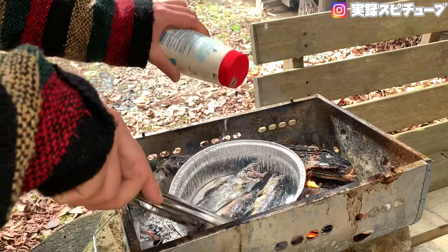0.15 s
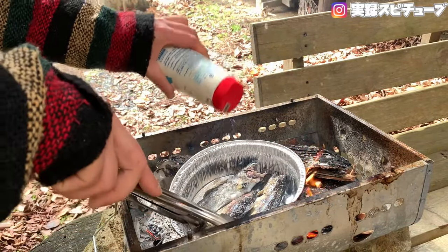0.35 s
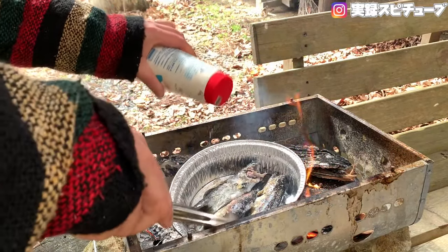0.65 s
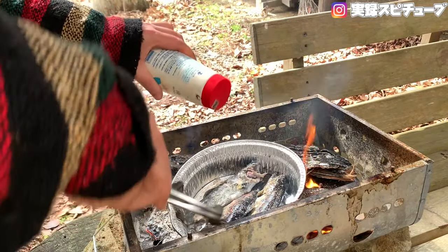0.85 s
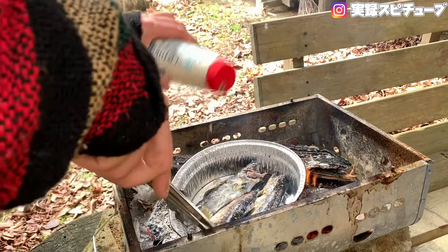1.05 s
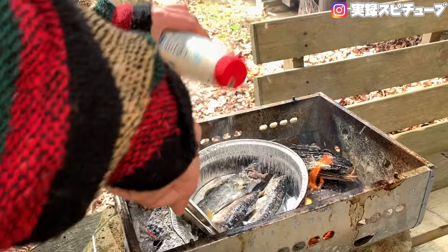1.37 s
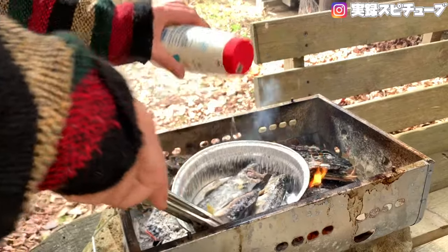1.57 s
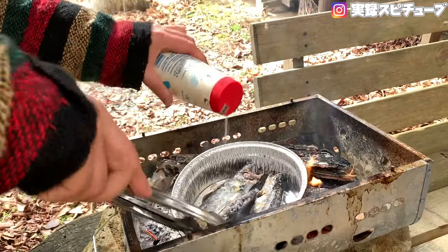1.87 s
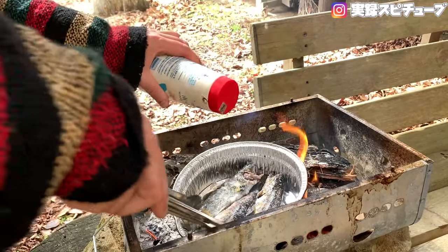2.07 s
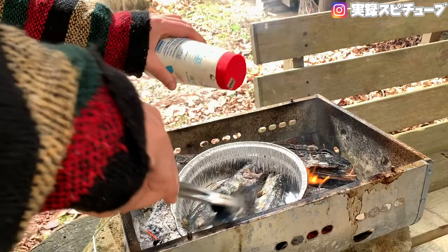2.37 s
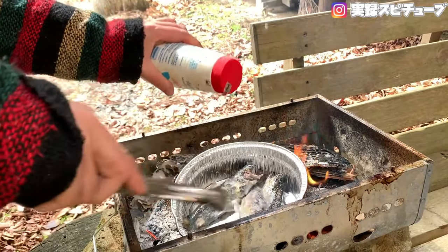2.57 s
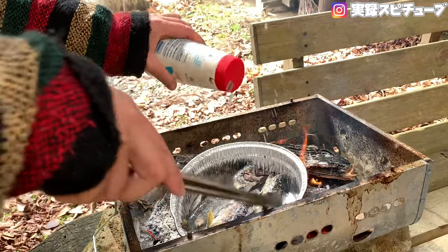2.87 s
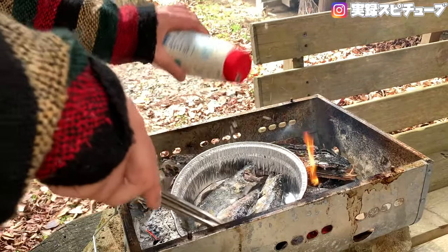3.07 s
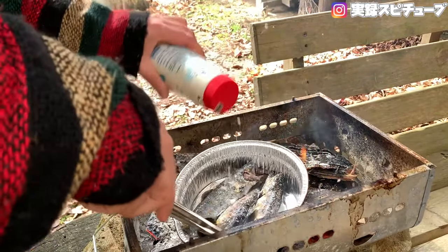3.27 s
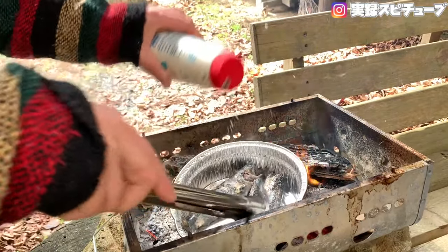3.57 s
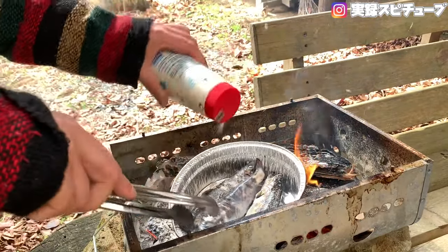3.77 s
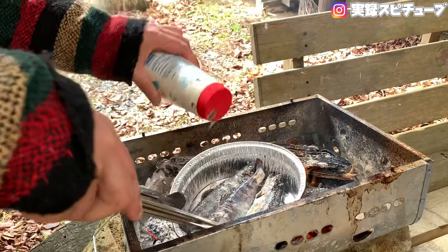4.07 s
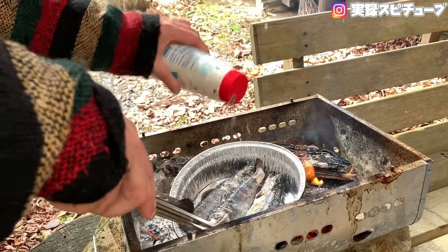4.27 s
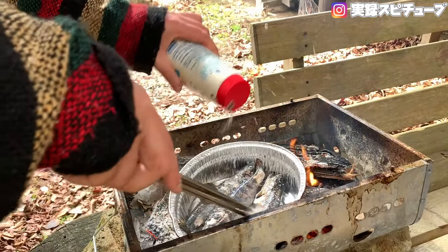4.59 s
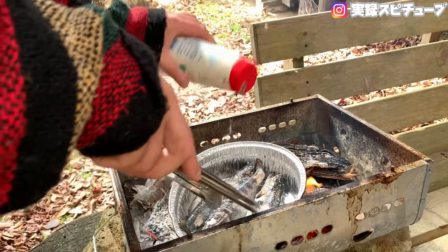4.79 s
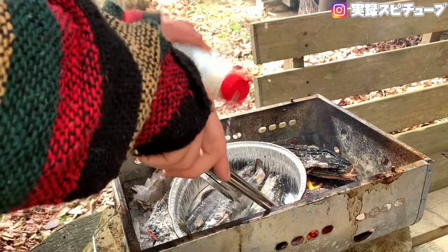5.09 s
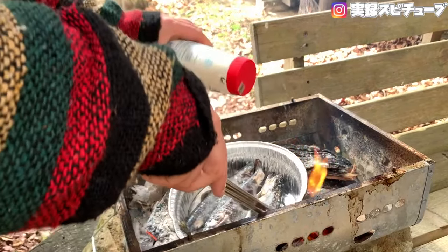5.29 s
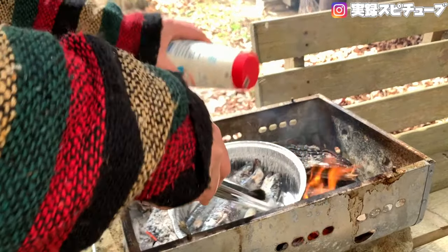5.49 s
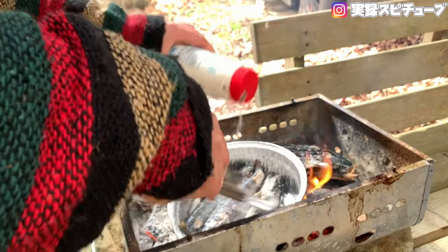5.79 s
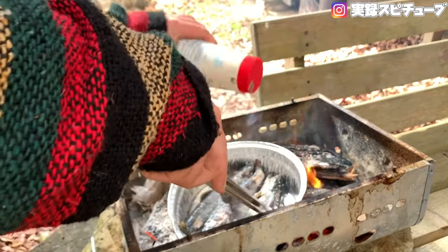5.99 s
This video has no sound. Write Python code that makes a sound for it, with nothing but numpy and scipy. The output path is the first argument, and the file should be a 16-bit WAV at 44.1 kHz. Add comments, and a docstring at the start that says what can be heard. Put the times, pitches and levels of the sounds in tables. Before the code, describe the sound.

A soft, steady ember hiss lies under fast shaker strokes of dry salt, about fourteen a second. Foil buckles with short dull toks, most strongly just before three seconds, and creases snap and crackle under dragging metal tongs. Crisp high clicks and occasional hollow box clangs punctuate it, ending with a clap of the tongs and more knocks. Low, woolly arm bumps and air flutter come close to the stereo microphone in dry open air.

```python
"""Salt rattles in a plastic bottle, shaken by hand over fish in a foil tray, above the soft hiss of charcoal outdoors.
A knitted sleeve rumbles and flutters near the stereo microphone; tongs make the foil tok, scrape and crinkle.
Sharp steel clicks follow, then knocks on the sheet-steel firebox that thud, clang and boom.
Shaped noise and tiny impacts make the hiss, salt and scrapes; damped sines make the metal and the bumps."""
import sys
import numpy as np
from scipy import signal
from scipy.fft import rfft, irfft, next_fast_len
from scipy.io import wavfile
from scipy.ndimage import uniform_filter1d, map_coordinates

SR = 44100
rng = np.random.default_rng(int(sys.argv[2]) if len(sys.argv) > 2 else 0)


def unload_wav(signal):
    """Save mono or channel-first audio to the path in sys.argv[1] as 16-bit WAV at rate SR, clipped to [-1, 1]."""
    wavfile.write(
        sys.argv[1],
        SR,
        np.round(np.clip(np.atleast_2d(signal).T, -1, 1) * 32767).astype(np.int16),
    )


N = 270774
TOP_HZ = 15900  # upper band limit

# Every source is a pair of rows: direct sound and scattered sound.
# Table levels set the balance within a source; its function adds the trims.


def amp(db):
    """Decibels to gain."""
    return 10 ** (np.asarray(db) / 20)


def unit(x):
    """Scale x to rms 1."""
    return x / np.sqrt(np.mean(x ** 2) + 1e-20)


def along(points, hz):
    """Read (f/Hz, value) points on a log frequency axis."""
    f, value = np.transpose(points)
    return np.interp(np.log(hz + 1), np.log(f + 1), value)


def wobble(rate):
    """A smooth random curve with rate knots a second."""
    knots = rng.standard_normal(int(N * rate / SR) + 4)
    return map_coordinates(knots, [np.arange(N) * rate / SR])


def filtered(x, response):
    """Multiply the spectrum of x by a response of frequency."""
    n = x.shape[-1]
    m = next_fast_len(n + 8192)
    return irfft(rfft(x, m) * response(np.fft.rfftfreq(m, 1 / SR)), m)[..., :n]


def coloured(x, spectrum):
    """Shape x by a spectrum in dB and scale it to rms 1."""
    return unit(filtered(x, lambda hz: amp(along(spectrum, hz))))


def noise(spectrum, size=N):
    """Two unrelated coloured noises: direct and scattered sound."""
    return coloured(rng.standard_normal((2, size)), spectrum)


def grains(spectrum, rate, spread_db):
    """Tiny impacts of uneven size, rate a second on average, at rms 1."""
    size_db = spread_db * np.minimum(rng.exponential(size=N), 4)
    hits = (rng.random(N) < rate / SR) * amp(size_db)
    return coloured(hits * rng.standard_normal((2, N)), spectrum)


def scrape(spectrum, t, rate, spread_db):
    """Edges chatter on sheet metal: a run of separate tiny contacts, at rms 1."""
    hits = (rng.random(len(t)) < rate / SR) * amp(spread_db * rng.standard_normal(len(t)))
    return coloured(hits * rng.choice([-1, 1], (2, len(t))), spectrum)


def fade(t, t60):
    """Exponential decay, down 60 dB after t60 seconds."""
    return np.exp(-np.log(1000) * t / t60)


def onset(t, attack_s):
    """Exponential rise from 0 towards 1."""
    return 1 - np.exp(-t / attack_s)


def ring(modes, t, t60, scatter_db):
    """Damped modes with fresh random strengths and phases, starting near rms 1."""
    hz, db = np.transpose(modes)[:2, :, None]
    gain = amp(db + scatter_db * rng.standard_normal((2, len(modes), 1)))
    phase = 2 * np.pi * rng.random(gain.shape)
    waves = gain * np.sin(2 * np.pi * hz * t + phase) * fade(t, np.reshape(t60, (-1, 1)))
    return waves.sum(axis=1) / np.sqrt(np.sum(gain ** 2, axis=1) / 2)


def snap(hz, t, t60, octaves, count=4):
    """A small patch of metal lets go: a few chance modes around a pitch."""
    pitches = np.minimum(hz * 2 ** (octaves * rng.uniform(-1, 1, count)), TOP_HZ)
    return ring([(f, 0) for f in pitches], t, t60, scatter_db=5.5)


def swell(s, rise, fall, shape):
    """A hump of height 1 at s seconds; the higher the shape, the rounder its top."""
    first, last = max(int((s - 5 * rise) * SR), 0), min(int((s + 5 * fall) * SR), N)
    near = np.arange(first, last)
    u, hump = near / SR - s, np.zeros(N)
    hump[near] = np.exp(-np.abs(u / np.where(u < 0, rise, fall)) ** shape)
    return hump


def patchy(x, depth_db, size=3):
    """The colour shifts at random as the contact moves from spot to spot."""
    z = signal.stft(x, nperseg=512)[2]
    field = uniform_filter1d(rng.standard_normal(z.shape[1:]), size, axis=0)  # smooth over frequency
    field = uniform_filter1d(field, 2 * size, axis=1)  # smooth over time
    return unit(signal.istft(z * amp(depth_db * unit(field)), nperseg=512)[1][:, :N])


def add(track, s, sound):
    """Mix a sound into the track at s seconds."""
    part = track[:, max(round(s * SR), 0):][:, :sound.shape[1]]
    part += sound[:, :part.shape[1]]


# colour of the coal hiss: f/Hz, level/dB
COAL_COLOUR = [(20, -10), (50, 6), (100, -2.5), (300, 2.5), (1000, -3.5), (2500, -8.5), (5000, -12.5),
               (8000, -14), (15500, -11.5)]
# colour of small foil and ember ticks: f/Hz, level/dB
FOIL_COLOUR = [(200, -5), (450, -2.5), (1000, 3.5), (1800, -8), (3000, -6), (6000, -12), (16000, -5)]
# colour of low air rumble: f/Hz, level/dB
RUMBLE_COLOUR = [(15, -38), (30, -6), (55, 6), (85, 1.5), (125, -10), (200, -19), (500, -40)]
DRAUGHT_DB, DRAUGHT_SWING_DB = -50.5, 5  # moving air at the microphone: centre level, depth of its swells


def coals():
    """Burning charcoal and hot fat: a soft steady hiss with faint crackles, in a light uneven draught."""
    hiss = amp(-41.5 + 0.47 * wobble(6.0)) * noise(COAL_COLOUR)
    draught_level = amp(DRAUGHT_DB + DRAUGHT_SWING_DB * wobble(6))
    draught = draught_level * noise(RUMBLE_COLOUR) * amp([[0], [-4]])
    crackles = amp(-56) * grains(FOIL_COLOUR, rate=120, spread_db=1)
    return hiss + crackles + draught


def steadied(x, size=1300):
    """Even out the slow swells of a noise."""
    return x / np.sqrt(np.abs(uniform_filter1d(x ** 2, size, axis=1)) + 0.042)


# arm sweeps past the microphone: fastest t/s, time to swell or fade t/s, rumble level/dB, flutter level/dB
ARM_SWEEPS = [(0.1, 0.089, -33, -39.5), (0.26, 0.06, -26.5, -34), (0.45, 0.019, -26.5, -55),
              (0.73, 0.13, -27.5, -35.5), (0.95, 0.19, -34, -49), (1.93, 0.058, -28.5, -40),
              (2.41, 0.066, -32.5, -47), (2.69, 0.091, -28.5, -40), (2.82, 0.032, -22, -34),
              (2.96, 0.2, -35, -49), (3.63, 0.08, -30, -30), (3.78, 0.083, -25.5, -29.5),
              (3.99, 0.16, -34.5, -57), (4.5, 0.32, -41, -44), (5.301, 0.12, -34, -40.5)]
# soft bumps of arm and sleeve: t/s, level/dB, f/Hz, t60/s
SLEEVE_BUMPS = [(0.08, -24, 59.6, .09), (0.623, -16.5, 135, 0.064), (0.660, -20.5, 150, 0.052),
                (0.699, -25, 413, 0.027), (0.704, -22, 98, .075), (0.724, -23, 193, 0.051),
                (0.768, -24, 170, 0.051), (0.787, -20.5, 100, 0.078), (0.922, -22, 370, 0.028),
                (0.93, -15, 258, 0.027), (0.944, -22, 140, 0.055), (0.965, -23, 134, .04),
                (1.925, -27, 61.6, .09), (2.649, -25, 135, 0.065), (2.675, -26, 70, 0.054),
                (2.813, -24, 90, 0.04), (3.745, -20, 290, 0.045), (3.75, -17.5, 158, 0.045),
                (3.786, -20, 257, 0.026), (5.276, -26.5, 65, 0.076)]
# colour of the higher flutter: f/Hz, level/dB
FLUTTER_COLOUR = [(60, -23), (115, 0.5), (170, 6), (260, -6.5), (400, -11.5), (800, -38), (2500, -60)]
IDLE_RUMBLE_DB, IDLE_FLUTTER_DB = -49.5, -47.5  # the arm is never quite still; before wobble and trims


def sleeve(attack_s=.003):
    """Each sweep of the arm pushes air and wool about near the microphone, with soft bumps."""
    idle = amp(4.5 * wobble(11))
    rumble_power = (amp(IDLE_RUMBLE_DB) * idle) ** 2
    flutter_power = (amp(IDLE_FLUTTER_DB) * idle) ** 2
    for s, width, rumble_db, flutter_db in ARM_SWEEPS:
        speed = swell(s, width, width, shape=1.15)
        rumble_power = rumble_power + (amp(rumble_db) * speed) ** 2
        flutter_power = flutter_power + (amp(flutter_db) * speed) ** 2
    rumble = np.sqrt(rumble_power) * steadied(noise(RUMBLE_COLOUR))
    flutter = amp(-2.5) * np.sqrt(flutter_power) * steadied(noise(FLUTTER_COLOUR))
    out, t = rumble + flutter, np.arange(SR // 5) / SR
    for s, db, hz, t60 in SLEEVE_BUMPS:
        tone = np.sin(2 * np.pi * (hz * t + rng.random((2, 1))))
        add(out, s, amp(db + 6.5) * tone * fade(t, t60) * onset(t, attack_s) ** 2)
    return out * amp([[0], [-2]])


# bouts of even shaking: first stroke t/s, last stroke t/s, number of strokes
SHAKING_BOUTS = [(0.012, 0.655, 9), (1.168, 1.641, 7), (1.731, 2.0, 4), (2.261, 2.261, 1), (2.66, 2.766, 2),
                 (2.977, 5.125, 28), (5.208, 6.08, 11)]
# vigour of the shaking hand: t/s, stroke level/dB
HAND_VIGOUR = [(0.1, -31.5), (1.2, -34.5), (1.65, -31.5), (1.95, -33.5), (2.7, -29), (3.0, -36.5),
               (3.37, -25.5), (3.45, -32), (3.87, -29), (4.4, -36), (4.5, -32), (5.11, -40.5),
               (5.21, -32.5), (5.78, -37), (6.1, -33)]
# colour of the fine salt: f/Hz, level/dB
SALT_COLOUR = [(200, -24), (700, 0), (1500, -1), (3000, -3), (4500, 1.5), (6000, -2), (7200, 1.5),
               (8500, 4), (12000, 1.5), (15500, -1)]
# colours of coarse grains and of single large crystals: f/Hz, level/dB
COARSE_COLOUR = [(600, -14), (1800, 9.0), (4500, -25.0), (7000, 11.5), (16000, 2.5)]
CRYSTAL_COLOUR = [(1000, -31), (4000, -14), (10000, -4.5), (16000, 6.5)]
FINE_DB, COARSE_DB, CRYSTAL_DB = 0.5, -8.0, -14  # each layer against the stroke level
SLIDE_RISE_S, SLIDE_FALL_S = .020, .0195  # swell and fade of one stroke


def shaker(clump_db=1.0, uneven_db=2.4):
    """At each stroke the salt slides and pelts the plastic bottle wall in clumps; coarse crystals tick."""
    bouts = [np.linspace(first, last, round(count)) for first, last, count in SHAKING_BOUTS]
    strokes = np.concatenate(bouts)
    vigour_db = np.interp(strokes, *np.transpose(HAND_VIGOUR))
    stroke_db = vigour_db + uneven_db * rng.standard_normal(len(strokes))
    power = np.zeros(N)
    for s, db in zip(strokes, stroke_db):
        power += amp(db) ** 2 * swell(s, SLIDE_RISE_S, SLIDE_FALL_S, shape=1.7)
    clumps = unit(amp(clump_db * wobble(170)))
    fine = clumps * patchy(grains(SALT_COLOUR, rate=14000, spread_db=0.35), depth_db=4)
    coarse = grains(COARSE_COLOUR, rate=430, spread_db=-3.0)
    crystals = grains(CRYSTAL_COLOUR, rate=19, spread_db=1)
    salt = amp(FINE_DB) * fine + amp(COARSE_DB) * coarse + amp(CRYSTAL_DB) * crystals
    return np.sqrt(power) * salt


# tongs dragging through the tray: t/s, level/dB
TONG_DRAG = [(0.0, -46), (0.92, -42), (1.7, -39), (1.95, -31.5), (2.1, -33.5), (2.35, -42), (2.75, -33.5),
             (2.9, -36.5), (3.2, -35.5), (3.9, -33.5), (4.5, -44.5), (4.9, -38), (5.5, -37.5),
             (5.76, -43.5), (6.1, -35.5)]


def drag_db(s):
    """Level of the dragging tongs at s seconds."""
    return np.interp(s, *np.transpose(TONG_DRAG))


# tongs stick and slip over the foil: start t/s, length t/s, slip level/dB, f/Hz
TONG_SKIDS = [(1.638, 0.026, -23.5, 1010), (1.816, 0.04, -23.5, 1060), (1.887, 0.04, -29, 940),
              (2.238, 0.046, -19.5, 1950), (2.748, 0.02, -14, 1150), (3.761, 0.025, -21.5, 870)]
SLIP_S, SLIP_SCATTER = 0.011, 0.194  # time between slips, and its relative scatter


def slips(uneven_db=4.5, detune=0.018, t60=0.014):
    """Stick and slip: each skid is a short, uneven run of small toks (t/s, level/dB, f/Hz, t60/s)."""
    rows = []
    for start, length, db, hz in TONG_SKIDS:
        for k, (late, strong, high) in enumerate(rng.standard_normal((8, 3))):
            if k * SLIP_S < length:
                s = start + SLIP_S * (k + SLIP_SCATTER * late * (k > 0))  # the first slip is on time
                rows.append((s, db + uneven_db * strong, hz * np.exp(detune * high), t60))
    return rows


# the foil tray buckles with a hollow tok: t/s, level/dB, f/Hz, t60/s
TRAY_TOKS = [(0.095, -17.5, 910, 0.011), (0.242, -16, 840, 0.012), (0.613, -11.5, 796, 0.0094),
             (0.631, -20, 860, 0.012), (0.646, -16.5, 1300, 0.016), (1.076, -16, 1090, 0.02),
             (1.198, -13, 910, 0.0065), (1.211, -21, 970, 0.0076), (1.934, -20, 1090, 0.02),
             (1.946, -10, 975, 0.013), (1.956, -13.5, 980, 0.014), (1.9765, -18, 1000, 0.015),
             (2.636, -19.5, 1525, 0.036), (2.7025, -2.5, 993, 0.013), (3.067, -8, 1070, .016),
             (3.279, -24, 1060, .014), (3.294, -15.5, 880, 0.021), (3.551, -18, 790, 0.0087),
             (3.631, -22.5, 1150, 0.029), (3.675, -23, 1100, .008), (3.685, -15.5, 630, 0.011),
             (3.747, -24, 570, 0.024), (3.857, -21, 880, 0.023), (4.327, -17, 910, .012),
             (4.748, -25, 1140, .01), (4.988, -22.5, 810, 0.019), (5.573, -34, 1150, 0.014),
             (5.58, -18, 674, 0.014), (5.642, -28, 1760, 0.03)]


def tray(attack_s=0.0014, scattered_db=-4):
    """The loaded foil gives way in a few heavily damped cycles; the tongs rub on it for a moment after."""
    out, t = np.zeros((2, N)), np.arange(SR // 12) / SR
    for s, db, hz, t60 in list(TRAY_TOKS) + slips():
        phase = np.array([[0], [rng.random()]])
        tok = np.sin(2 * np.pi * (hz * t + phase)) * fade(t, t60)
        rub_colour = [(hz / 3, -25), (hz, 0), (hz * 3, -20), (16000, -40)]
        rub = amp(-17.5) * scrape(rub_colour, t, rate=300, spread_db=-1) * fade(t, 0.088)
        add(out, s, amp(db + 3.5) * (tok + rub) * onset(t, attack_s) * amp([[0], [scattered_db]]))
    drag_level = amp(drag_db(np.arange(N) / SR) - 3.5 + 1.8 * wobble(45))
    return out + drag_level * patchy(grains(FOIL_COLOUR, rate=900, spread_db=-0.2), depth_db=5.5)


# single creases snapping: t/s, level/dB, f/Hz
FOIL_CRINKLES = [(0.083, -23, 1390), (0.0954, -19.5, 1680), (0.174, -25, 1620), (0.243, -35, 2000),
                 (0.333, -28.5, 1930), (0.344, -26, 1900), (0.416, -26, 2100), (0.484, -26, 1990),
                 (0.497, -25.5, 1300), (0.512, -22, 3750), (0.669, -23, 2360), (0.909, -28.5, 1100),
                 (1.259, -30, 3570), (1.402, -23, 2970), (1.838, -25.5, 3200), (1.934, -23, 4500),
                 (1.945, -20.5, 4200), (1.9755, -29, 4000), (2.009, -18, 1430), (2.615, -19.5, 1480),
                 (3.21, -34, 1390), (3.225, -25, 1840), (3.503, -27, 1100), (3.551, -23, 1010),
                 (3.677, -37, 1670), (3.835, -21, 4500), (4.012, -18.5, 5540), (4.5, -28, 1860),
                 (4.7, -31, 1680), (4.845, -29, 2930), (4.9875, -25, 2000), (5.058, -31, 3820),
                 (5.07, -29, 1880), (5.3008, -24, 2440), (5.322, -24, 1500), (5.988, -21, 1510),
                 (6.008, -23.5, 1590), (6.082, -30, 2600), (6.094, -19.5, 2220)]
CRACKLE_PER_S, CRACKLE_DB, CRACKLE_RISE_DB = 200, -3, 5  # rate; least level against the drag; most added
CRACKLE_HZ, CRACKLE_REACH_OCTAVES = 3415, 2.0  # middle pitch, reach to either side


def crinkles(level_db=-1, t60=0.0093, octaves=0.885, cycles=16):
    """Foil creases snap one by one; many tiny ones crackle under the dragging tongs, each at its own pitch."""
    out, t = np.zeros((2, N)), np.arange(SR // 50) / SR
    for s, db, hz in FOIL_CRINKLES:
        add(out, s, amp(db + level_db) * snap(hz, t, t60, octaves, count=8))
    for when, strong, high in rng.random((round(CRACKLE_PER_S * N / SR), 3)):
        s = when * N / SR
        hz = CRACKLE_HZ * 2 ** (CRACKLE_REACH_OCTAVES * (2 * high - 1))
        db = drag_db(s) + CRACKLE_DB + CRACKLE_RISE_DB * strong ** 2
        add(out, s, amp(db) * snap(hz, t, cycles / hz, octaves, count=3))
    return out


TOUCHES_PER_S, TOUCH_DB, TOUCH_HZ = 1.5, -23, 8200  # rate, middle level and pitch


def touches(uneven_db=3, detune=0.36):
    """The tongs touch lightly at chance moments: (t/s, level/dB, f/Hz)."""
    rows = []
    for when, strong, high in rng.random((round(TOUCHES_PER_S * N / SR), 3)):
        hz = TOUCH_HZ * np.exp(detune * (2 * high - 1))
        rows.append((when * N / SR, TOUCH_DB + uneven_db * (2 * strong - 1), hz))
    return rows


# sharp metal clicks: t/s, level/dB, contact f/Hz
STEEL_CLICKS = [(0.0975, -11, 6900), (0.174, -15, 7500), (0.416, -26, 8000), (0.253, -11.5, 11150),
                (0.512, -25, 9500), (0.53, -24, 11100), (1.259, -16.5, 9500), (1.4225, -10, 8300),
                (1.43, -18, 8850), (1.6845, -14, 4500), (2.383, -23.5, 6830), (2.421, -34, 11300),
                (2.5792, -4, 10400), (2.598, -8, 10800), (2.7005, -4.5, 10550), (2.775, -17, 11000),
                (3.065, -8.5, 10540), (3.31, -11, 10630), (3.676, -11.5, 6850), (4.0238, -8, 9900),
                (4.1612, -8, 6200), (4.2855, -13.5, 6700), (4.511, -16.5, 9150), (4.559, -31, 8000),
                (4.749, -19.5, 7000), (5.2227, -15.5, 6600), (5.3033, -20, 4260), (5.411, -13.5, 7350),
                (5.475, -12.5, 12100), (5.6114, -5.5, 7530)]
# tong tips clap shut: t/s, level/dB, arm f/Hz
TONG_CLAPS = [(2.5795, -19, 3850), (2.601, -24, 3800), (5.6116, -13.5, 2930)]
# modes of the tips in a clap: f/Hz, level/dB, t60/s
TIP_MODES = [(4760, -9, 0.017), (7150, 7, 0.034), (7700, -14, 0.02), (7800, 10, 0.026), (10100, -4, 0.033),
             (13100, 8, 0.025)]
# colour of steel cracking on steel: f/Hz, level/dB
CRACK_COLOUR = [(500, -9.5), (2000, -18.5), (3500, -2), (6000, -5.5), (8000, 3), (12000, -6), (16000, -4)]
ARM_DB, ARM_T60_S = 1, 0.072  # the arms' own note in a clap, against the tip modes


def clicks(ring_db=-12, ring_t60=0.024):
    """Steel on steel: a crack, a ping pitched by the spot, an uneven ring, faint scatter; claps ring the tongs."""
    out, t = np.zeros((2, N)), np.arange(SR // 10) / SR
    for s, db, hz in list(STEEL_CLICKS) + touches():
        crack = noise(CRACK_COLOUR, size=len(t)) * (fade(t, .017) + amp(-20) * fade(t, .09))
        ping = amp(2.5) * ring([(hz, 0)], t, 0.0044, scatter_db=0)
        after = amp(ring_db) * snap(hz, t, ring_t60, octaves=0.46)
        add(out, s, amp(db - 7.5) * (crack + ping + after) * onset(t, .0004))
    for s, db, hz in TONG_CLAPS:
        modes = np.array([(hz, ARM_DB, ARM_T60_S), *TIP_MODES])
        add(out, s, amp(db) * ring(modes, t, modes[:, 2], scatter_db=1))
    return out


THUD_DAMPING = 1.45  # exponent: how much faster the high modes die


def struck(modes, t, t60, scatter_db):
    """One push sets all modes off in phase, their gains summing to 1; the high ones die first."""
    hz, db = np.transpose(modes)[:, :, None]
    gain = amp(db + scatter_db * rng.standard_normal((2, len(modes), 1)))
    life = t60 * (hz[0] / hz) ** THUD_DAMPING
    return (gain * np.sin(2 * np.pi * hz * t) * fade(t, life)).sum(axis=1) / gain.sum(axis=1)


# heavy, damped modes of the box floor: f/Hz, level/dB
FLOOR_MODES = [(400, -19.5), (530, 1), (640, 4), (740, 3), (1080, 3), (1350, -8)]
REBOUND_S, REBOUND_DB, REBOUND_LOSS_DB = 0.013, -7.5, 3  # mean gap, first against the blow, loss a contact


def thuds(t, t60, detune=0.187, level_db=6):
    """A dull blow and its uneven rebounds, each on another spot of the box floor."""
    out = struck(FLOOR_MODES, t, t60, scatter_db=4.0)
    gaps = REBOUND_S * (.5 + rng.random(4))
    for k, s in enumerate(np.cumsum(gaps)):
        spot = np.exp(detune * rng.standard_normal())
        rebound = struck(FLOOR_MODES, spot * t, t60, scatter_db=2)
        add(out, s, amp(REBOUND_DB - k * REBOUND_LOSS_DB) * rebound)
    return amp(level_db) * out * amp([[0], [-6]])


# tongs against the firebox: t/s, clang level/dB, thud level/dB, boom level/dB, tong ring level/dB,
# clang t60/s, contact brightness f/Hz, tong f/Hz
FIREBOX_KNOCKS = [(1.076, -31, -27, -36, -25, 0.64, 2250, 4980),
                  (1.567, -25, -12.5, -28, -35, 0.48, 1060, 4950),
                  (1.9961, -25.5, -21, -28, -19, 0.33, 2540, 4940),
                  (2.944, -23.5, -42, -31.5, -17.5, 0.43, 2550, 5080),
                  (3.145, -23.5, -38, -28, -18.5, 0.38, 2450, 5070),
                  (3.515, -23.5, -12.5, -26.5, -30, 0.35, 1310, 5000),
                  (4.092, -27, -23, -32, -23, 0.4, 2400, 5090),
                  (4.240, -33, -39, -32, -24, 0.52, 2410, 5000),
                  (5.5284, -34.5, -15, -31.5, -56, 0.56, 1180, 5030),
                  (5.939, -26, -29, -27, -29.5, 0.29, 2200, 5100)]
# modes of the sheet-steel box: f/Hz, level/dB
BOX_MODES = [(266, 3.5), (490, -4.5), (530, 4.5), (590, 3.5), (669, 2), (743, -1), (840, 1), (931, -4),
             (1060, -6), (1222, 1), (1394, -1), (1474, -19), (1618, -13), (1712, 6), (2024, 2.5), (2293, 2)]
# modes of its broad panels: f/Hz, level/dB
PANEL_MODES = [(128, -11), (163, -1.5), (180, -7.5), (215, -16.5)]
# modes of the hand-damped tong arms, before the grip detunes them: f/Hz, level/dB, t60/s
TONG_MODES = [(3661, -12, .05), (5020, 5, .045), (5270, 4, .028), (7014, -3, .03), (8380, -1, .035),
              (9636, -5, .03), (10930, -3, .05), (11790, -5, .03)]
# colour of the box chatter: f/Hz, level/dB
CLANG_COLOUR = [(60, -18), (160, -11), (320, -4.5), (600, -1), (1200, 1), (2000, -0.5), (3000, -1.5),
                (6000, 4), (16000, -44)]


def firebox(thud_t60=0.077):
    """A knock rings the tongs briefly; the steel box thuds, clangs on, and its panels boom."""
    out, t = np.zeros((2, N)), np.arange(SR // 3) / SR
    for s, db, thud_db, boom_db, tong_db, t60, bright_hz, tong_hz in FIREBOX_KNOCKS:
        rattle = scrape(CLANG_COLOUR, t, rate=900, spread_db=4) * fade(t, t60 * 0.95)
        load = 1 + .005 * rng.standard_normal()  # shifts the box pitch slightly
        box = ring(BOX_MODES, load * t, t60, scatter_db=3.5)
        clang = amp(-3.5) * box + amp(3.0) * rattle
        # a soft contact leaves the high modes quiet
        clang = signal.lfilter(*signal.butter(2, min(bright_hz, SR / 4), fs=SR), clang)
        thud = thuds(t, thud_t60)
        shudder = amp(-3.0) * noise(FLUTTER_COLOUR, size=len(t)) * fade(t, t60 * 1.13)
        panels = ring(PANEL_MODES, t, t60 * 1.07, scatter_db=4.5)
        boom = (panels + shudder) * onset(t, 0.007)
        grip = tong_hz / TONG_MODES[1][0]  # the hand's grip detunes the arms
        arms = amp(2.5) * ring(TONG_MODES, grip * t, np.array(TONG_MODES)[:, 2], scatter_db=2)
        crack_fade = amp(9) * fade(t, .009) + amp(-4) * fade(t, .14)
        crack = noise(CRACK_COLOUR, size=len(t)) * crack_fade
        blow = amp(db) * clang + amp(thud_db) * thud + amp(boom_db) * boom + amp(tong_db) * (arms + crack)
        add(out, s, blow * onset(t, .0004))
    return out


# phase between the two microphone channels: f/Hz, phase/rad
CHANNEL_PHASE = [(30, 1.5), (150, 0.51), (500, 1.12), (1100, 1.3), (2000, 1.13), (3500, 2.01), (5500, 1.84),
                 (7000, 1.23), (8550, 3.06), (10400, 5.66), (11400, 6.5), (13450, 9.5), (15400, 12)]
# signed share of the side that follows the mid: f/Hz, share
SIDE_LINK = [(100, 0.44), (600, 0.046), (1100, 0.44), (2000, -0.78), (2600, 0.45), (3300, 0.26),
             (4500, -0.61), (6200, -0.36), (7500, -0.58), (10000, -.82), (15000, -.75)]


def scene():
    """Spaced microphone ports trade mid against side with frequency, by the phase between the channels."""
    direct, scattered = coals() + sleeve() + shaker() + tray() + crinkles() + clicks() + firebox()
    half = lambda hz: along(CHANNEL_PHASE, hz) / 2
    link = lambda hz: np.clip(along(SIDE_LINK, hz), -1, 1)
    mid = filtered(direct, lambda hz: np.cos(half(hz)))
    linked_side = filtered(direct, lambda hz: 1j * np.sin(half(hz)) * link(hz))
    loose_side = filtered(scattered, lambda hz: np.sin(half(hz)) * np.sqrt(1 - link(hz) ** 2))
    side = linked_side + loose_side
    return np.array([mid + side, mid - side])


def record(dry):
    """A steep low-pass keeps nothing above the band limit."""
    return filtered(dry, lambda hz: hz < TOP_HZ)


dry = scene()
out = record(dry)
unload_wav(out)
```